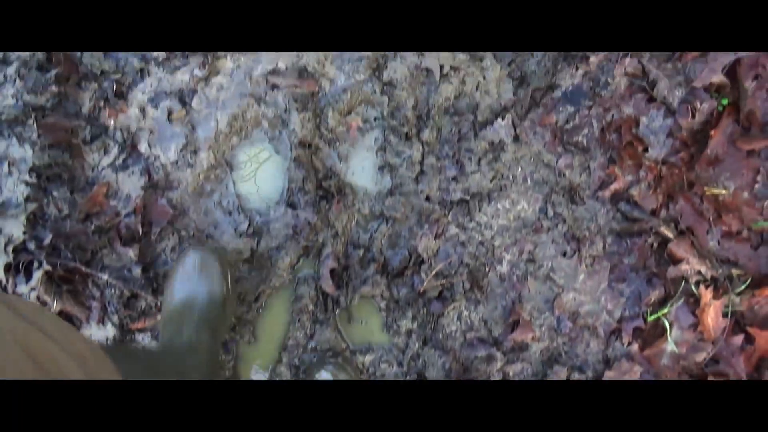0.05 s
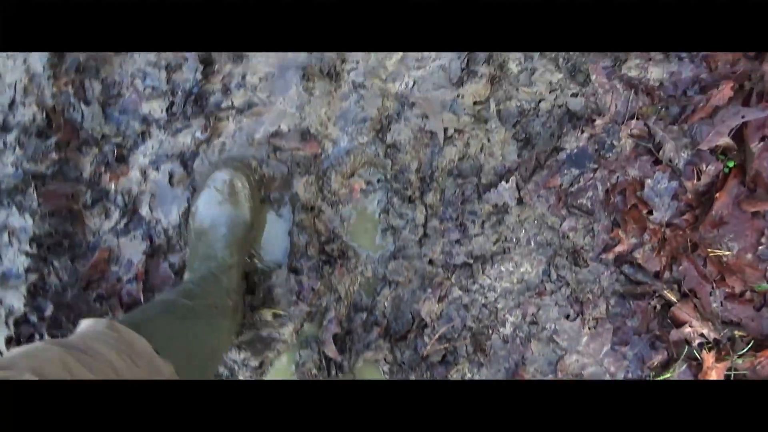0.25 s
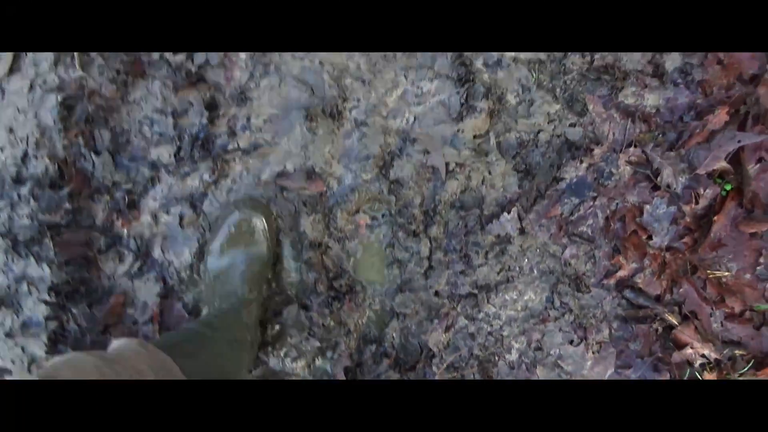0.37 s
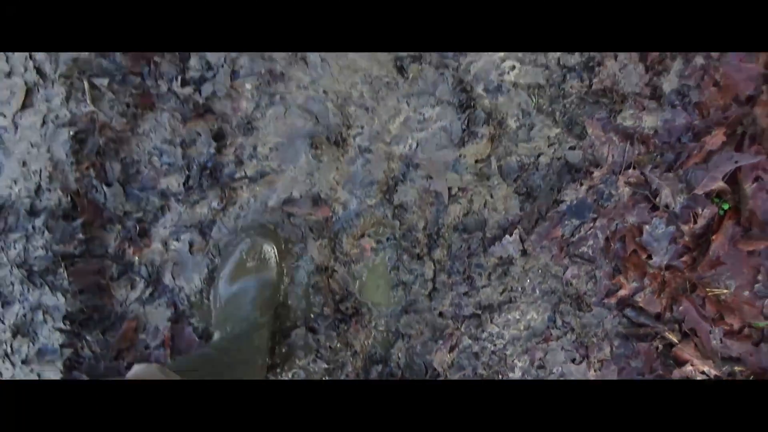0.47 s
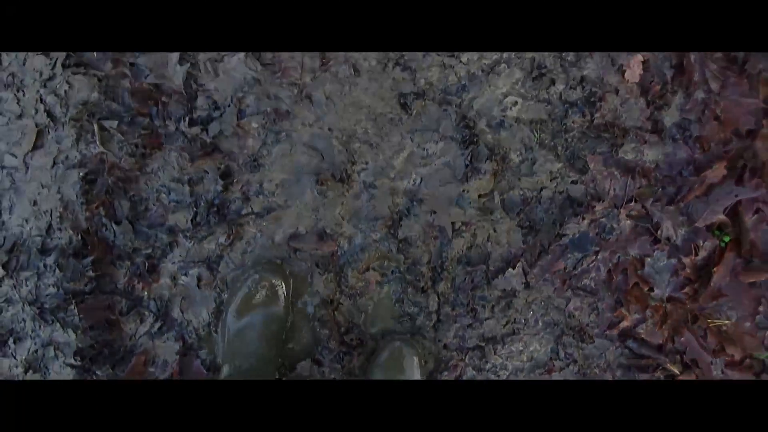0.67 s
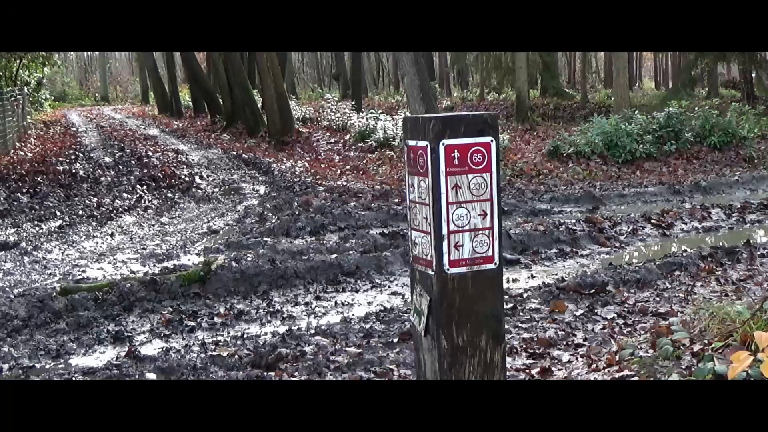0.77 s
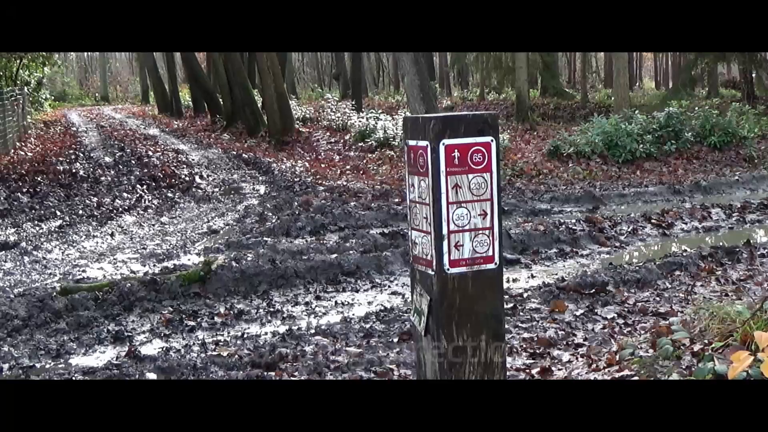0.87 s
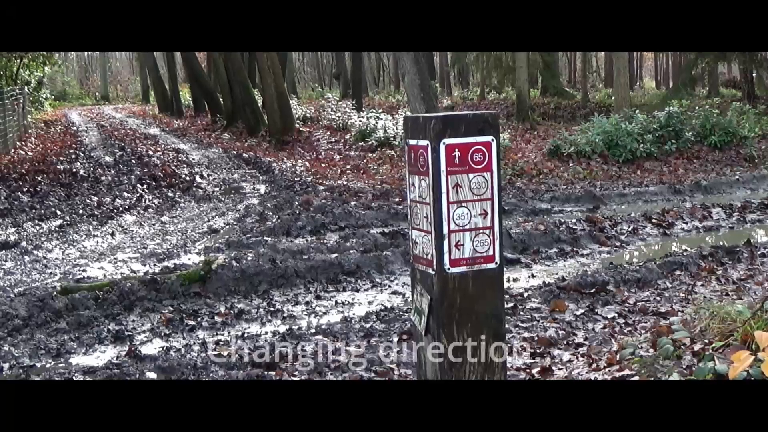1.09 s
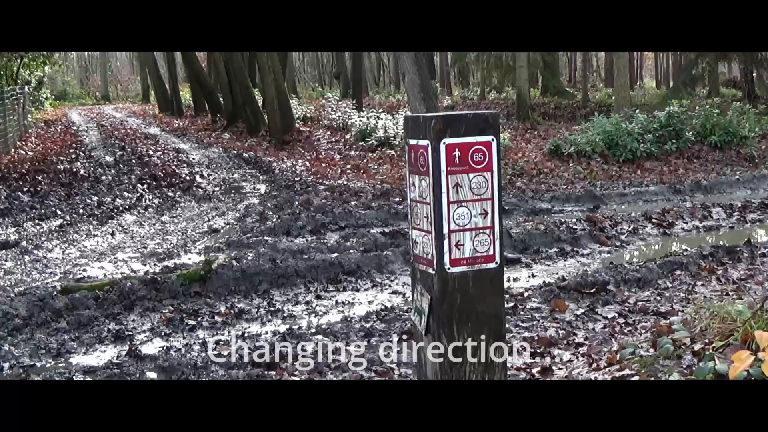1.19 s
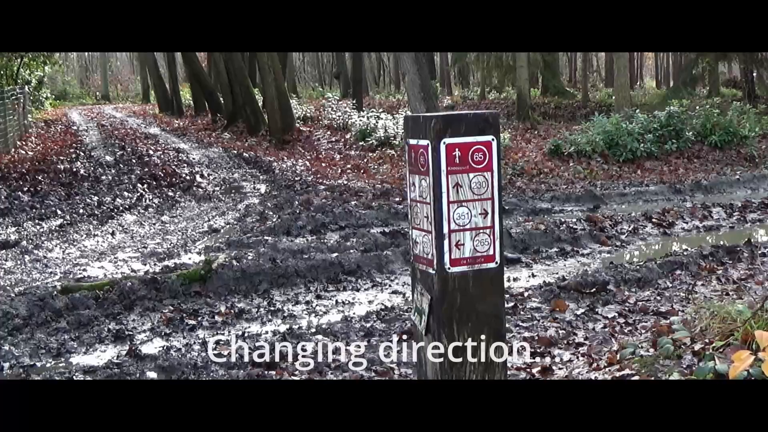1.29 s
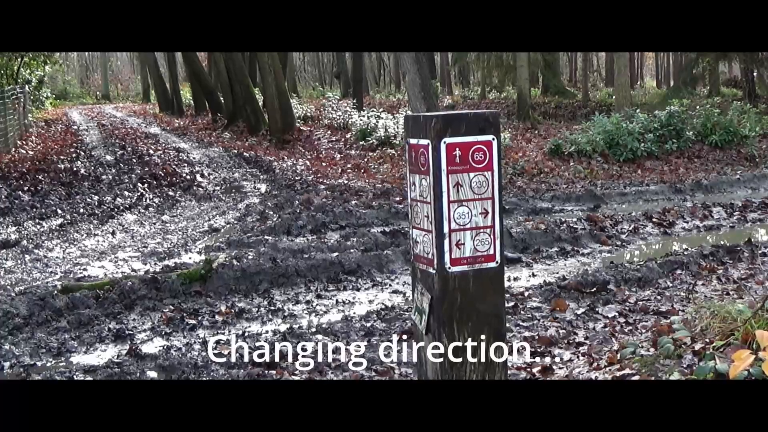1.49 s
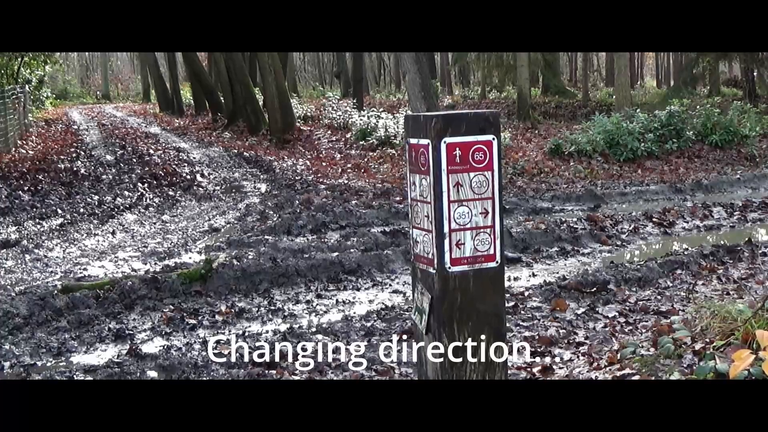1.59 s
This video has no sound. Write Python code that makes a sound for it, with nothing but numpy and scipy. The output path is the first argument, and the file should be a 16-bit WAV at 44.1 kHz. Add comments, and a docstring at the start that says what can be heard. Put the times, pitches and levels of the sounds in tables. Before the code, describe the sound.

Close to the microphone, rubber boots squelch twice in wet mud, slurping and bubbling over soft thuds. Midway through the second step the sound switches to a quiet wood with a low, far rumble and faintly ticking leaves.

```python
"""A muddy path under dead leaves, where two rubber-boot steps fall close by.
Each step squeezes out a crackle of bursting films and small bubbles over a lower slurp of mud.
Water spurts from under the sole, air pockets pop and the soft ground thuds; wet leaves tick and rustle.
Partway through the second step the scene cuts to a quiet wood with a far rumble and faint leaves."""
import sys
import numpy as np
from scipy import signal
from scipy.fft import next_fast_len
from scipy.io import wavfile
from scipy.ndimage import uniform_filter1d

SR = 44100
rng = np.random.default_rng(int(sys.argv[2]) if len(sys.argv) > 2 else 0)


def digitize_waveform(pressure):
    """Quantize a signal to 16-bit integers and store it at the path in sys.argv[1].

    Rows of a 2-D input are taken as channels; values are limited to [-1, 1].
    """
    field = np.atleast_2d(pressure).T
    bounded = np.clip(field, -1, 1)
    quanta = np.round(bounded * 32767).astype(np.int16)
    wavfile.write(sys.argv[1], SR, quanta)


N = 72765
TIME = np.arange(N) / SR
CUT_S = .806  # the path gives way to the quiet wood

# spectra of the outdoor air: f/Hz, relative level/dB
PATH_SPECTRUM = [(15, -23), (28, -3), (70, 0), (130, -7), (260, -10.5), (460, -4), (700, -10), (1260, -12),
                 (2500, -17), (4500, -24), (5700, -19.5), (7400, -12.5), (9500, -16.5), (12500, -18.5),
                 (16000, -20.5)]
WOOD_SPECTRUM = [(15, -25), (28, -10), (55, -1.5), (110, 0), (240, -5), (400, -13.5), (590, -8),
                 (900, -18.5), (1260, -19), (2300, -29.5), (3100, -30), (4700, -34.5), (7200, -28),
                 (8500, -34), (12500, -37), (16000, -41)]
# filters on the side signal of the air and the steps, so the channels differ slightly: f/Hz, gain/dB
PATH_SIDE = [(30, -25), (100, -23), (300, -9), (700, -12), (2000, -23.5), (7000, -19), (16000, -21)]
WOOD_SIDE = [(30, -18), (100, -18), (300, -15.5), (700, -17.5), (2000, -19.5), (4000, -24.5), (7000, -10),
             (12000, -20), (16000, -32)]
STEP_SIDE = [(100, -26), (200, -22), (330, -15), (700, -28), (1500, -22), (3000, -21), (7000, -26),
             (16000, -24.5)]
# dead leaves rustling: t/s, length/s, level/dB, f/Hz
LEAF_RUSTLES = [(.592, .025, -44, 13000), (.858, 0.01, -59, 11000), (1.586, .014, -53, 4250)]
# wet leaves and drops ticking: t/s, level/dB, f/Hz
LEAF_TICKS = [(.0035, -29.5, 14000), (.025, -28, 12600), (.0408, -37, 10100), (.0455, -35, 7260),
              (.1028, -42, 13000), (.1131, -29, 7400), (.1203, -45, 13000), (.1847, -30, 10000),
              (.4655, -24, 11100), (.5138, -32, 8140), (.53, -33.5, 10000), (.5667, -30.5, 12600),
              (1.1228, -48.5, 12000), (1.1612, -49, 11500), (1.3588, -47, 10000), (1.464, -43, 10200),
              (1.504, -46.5, 7600), (1.611, -49, 11900)]
# the walker's weight settling on the heel: t/s, length/s, f/Hz, peak level/dB
HEEL_LOAD = [(.465, .085, 66.8, -43.5)]
# the boot meeting the ground: t/s, length/s, level/dB, f/Hz
BOOT_THUDS = [(.163, 0.034, -40, 343), (.213, 0.027, -43.5, 270), (.314, 0.025, -38.5, 700),
              (.425, 0.027, -44, 189), (.68, 0.027, -45, 149), (.759, 0.015, -39.5, 567)]
# air pockets popping in the mud: t/s, f/Hz, peak level/dB, 60 dB decay time/s
AIR_POCKETS = [(.208, 2600, -25, .008), (.2225, 2540, -28, 0.048), (.2455, 2940, -13.5, 0.003),
               (.2765, 1610, -17.5, 0.034), (.3165, 1670, -27, 0.012), (.3193, 1100, -14.5, .011),
               (.3195, 746, -18.5, 0.025), (.3255, 1390, -31, 0.0054), (.3525, 2180, -22, 0.026),
               (.4195, 1200, -24, 0.015), (.4262, 2010, -15.5, 0.02), (.4495, 2270, -26.5, 0.013),
               (.5993, 2200, -35.5, 0.019), (.6515, 2080, -28.5, 0.0089), (.695, 1640, -23, 0.012),
               (.7003, 1250, -11.5, 0.01), (.7005, 680, -17, 0.018), (.7222, 2470, -18.5, 0.011),
               (.7345, 1680, -15.5, 0.011), (.745, 1890, -18.5, 0.019), (.7485, 3450, -16.5, 0.015),
               (.7612, 1610, -22, .01), (.7808, 1240, -17.5, 0.0078)]
# water spurting from under the sole: t/s, length/s, level/dB, f/Hz
WATER_SPURTS = [(.2055, 0.0044, -25, 8400), (.2378, .004, -23, 9150), (.2455, 0.0023, -15, 7940),
                (.2493, .001, -16.5, 8600), (.254, .0055, -19.5, 6530), (.2672, 0.0014, -13.5, 8600),
                (.2735, 0.0046, -18.5, 9000), (.2797, 0.0031, -16, 10400), (.2857, 0.0027, -18, 11100),
                (.294, 0.004, -21.5, 3560), (.3078, 0.0054, -21.5, 7350), (.3194, .0018, -21, 8260),
                (.3232, 0.0012, -19.5, 14000), (.3255, .005, -26, 8300), (.3678, .0055, -26, 7560),
                (.371, 0.00084, -20.5, 7100), (.383, 0.002, -25, 7800), (.387, 0.002, -22, 9600),
                (.396, 0.0027, -24.5, 12500), (.4127, 0.0052, -28, 7850), (.4255, 0.0013, -19.5, 14000),
                (.427, 0.0022, -20.5, 8450), (.706, 0.0018, -19, 8100), (.7092, 0.0031, -16, 8400),
                (.7138, 0.0041, -16.5, 7800), (.718, .003, -25, 7200), (.7305, .0015, -19.5, 7600),
                (.7454, .002, -17, 10300), (.7485, 0.0035, -20.5, 7060), (.7512, 0.0012, -20.5, 11000),
                (.7738, 0.0025, -26, 10600), (.785, 0.0022, -29.5, 11300), (.7922, 0.0012, -28, 7450),
                (.7955, 0.0014, -25.5, 11400)]
# filters that colour the spurts, slurp and crackle: f/Hz, gain/dB
SPURT_COLOUR = [(100, -36.5), (500, -8), (1500, -10.5), (3400, -1), (5600, -9.5), (7300, 8), (11500, -2.5),
                (16000, -9.5)]
SLURP_COLOUR = [(60, -28), (200, -15), (400, -11), (650, -4), (1200, 0.5), (2100, 2), (2800, -12),
                (4500, -0.5), (16000, -73)]
CRACKLE_COLOUR = [(100, -48), (600, -24), (1500, -17), (3300, -7), (4500, -8.5), (5600, -9.5), (7300, -1.5),
                  (9000, -4), (11600, -2.5), (16000, -20)]
# envelopes of the slurp and crackle, one list for each step: t/s, level/dB
SLURP_ENVELOPES = [
    [(.16, -69), (.2, -38), (.24, -35.5), (.278, -27.5), (.303, -33), (.324, -24.5), (.34, -30.5),
     (.405, -35), (.42, -33.5), (.438, -41.5), (.5, -52)],
    [(.58, -65), (.602, -43.5), (.622, -47), (.645, -39.5), (.675, -35), (.697, -27), (.73, -33),
     (.757, -38.5), (.768, -34), (.81, -38.5)],
]
CRACKLE_ENVELOPES = [
    [(.14, -47), (.198, -39.5), (.208, -25.5), (.234, -30.5), (.277, -19), (.303, -27), (.328, -23),
     (.345, -32.5), (.387, -30), (.405, -37.5), (.422, -30.5), (.436, -33), (.52, -56.5)],
    [(.56, -63), (.605, -39.5), (.624, -45.5), (.638, -31.5), (.682, -27.5), (.715, -26), (.738, -28),
     (.76, -38), (.787, -33.5), (.797, -31), (.81, -30.5)],
]


def amp(db):
    """Amplitude ratio of a level in decibels."""
    return 10 ** (np.asarray(db) / 20)


def unit(x):
    """Normalisation to an rms of 1."""
    return x / np.sqrt(np.mean(x ** 2) + 1e-20)


def levelled(x, length, db):
    """Equivalent level: x gets the energy of a steady sound of this level and length."""
    return amp(db) * x * np.sqrt(length * SR / np.sum(x ** 2))


def play(table, source):
    """Superposition: each row of a table sounds at its own time."""
    out = np.zeros(N)
    for start_s, *row in table:
        sound = source(*row)
        part = out[round(start_s * SR):][:len(sound)]
        part += sound[:len(part)]
    return out


def colour(x, points, centre_hz=1000, bump_db=0, octaves=.3):
    """Minimum-phase filtering by a gain curve with an optional resonant bump."""
    size = next_fast_len(len(x) + 2048)
    log_f = np.log2(abs(np.fft.fftfreq(size, 1 / SR)) + 1)
    hz, db = np.transpose(points)
    bump = bump_db / (1 + ((log_f - np.log2(centre_hz)) / octaves) ** 2)
    gain_db = np.interp(log_f, np.log2(hz + 1), db) + bump
    response = np.exp(np.conj(signal.hilbert(np.log(amp(gain_db)))))
    return np.fft.ifft(np.fft.fft(x, size) * response).real[:len(x)]


def burst(length):
    """Transient noise with a fast rise and an exponential decay."""
    u = np.arange(int(4 * length * SR) + 256) / (length * SR)
    return u * np.exp(-u / 0.29) * rng.choice([-1., 1.], len(u))


def ring(samples, hz, cycles):
    """A damped oscillator, falling to 1/e in the given number of cycles."""
    t = np.arange(samples) / SR
    return np.exp(-t * hz / cycles) * np.sin(2 * np.pi * hz * t)


def grains(per_s, spread_db, cycles, low_hz, high_hz, clump_db=0, pitches=36):
    """Shot noise: random impulses excite damped oscillators; clump_db makes their strength flicker."""
    clumps = unit(uniform_filter1d(rng.standard_normal(N), size=130))
    strength_db = spread_db * np.minimum(rng.exponential(1, N), 4) + clump_db * clumps
    clicks = amp(strength_db) * rng.choice([-1, 1], N) * (rng.random(N) < per_s / SR)
    oscillator = rng.integers(0, pitches, N)
    out = np.zeros(N)
    for k, hz in enumerate(np.linspace(low_hz, high_hz, pitches)):
        out += signal.oaconvolve(clicks * (oscillator == k), unit(ring(1024, hz, cycles)))[:N]
    return out


def follow(x, envelopes):
    """Amplitude modulation: a texture is evened out, then takes the envelope of each step."""
    even = x / np.sqrt(abs(uniform_filter1d(x ** 2, size=700)) + 1e-12)
    levels_db = [np.interp(TIME, *np.transpose(step), left=-120, right=-120) for step in envelopes]
    return even * amp(levels_db).sum(axis=0)


def scatter(x, t60):
    """Diffuse scattering: a short echo whose impulse response has unit energy."""
    t = np.arange(6000) / SR
    tail = rng.standard_normal(len(t)) * amp(-60 * t / t60) * (t > .001)
    return signal.oaconvolve(x, tail / np.linalg.norm(tail))[:N]


def stereo(mid, side, left_db):
    """Sum and difference stereo; a level difference shifts the image sideways."""
    return np.array([(mid + side) * amp(left_db), (mid - side) * amp(-left_db)])


def air(spectrum, width, db, left_db):
    """Stationary noise: outdoor rumble and hiss, widened by an uncorrelated side signal."""
    mid, side = (unit(colour(noise, spectrum)) for noise in rng.standard_normal((2, N)))
    return amp(db) * stereo(mid, colour(side, width), left_db)


def rustle(length, db, hz):
    """Friction noise of dead leaves brushing together."""
    spectrum = [(200, -1), (2000, -13), (8000, -4), (16000, -11)]
    return levelled(colour(burst(length), spectrum, hz, bump_db=11, octaves=0.17), length, db)


def tick(db, hz, snap_s=0.00032, tail_s=0.0023):
    """A brief impulse has a broad spectrum: a wet leaf or drop snaps, with a faint tail."""
    t = np.arange(600) / SR
    envelope = np.exp(-t / snap_s) + amp(-19) * np.exp(-t / tail_s)
    snap = envelope * rng.choice([-1., 1.], len(t))
    spectrum = [(200, -31), (3000, -14), (7000, 2), (14000, -4.5), (20000, -25)]
    return levelled(colour(snap, spectrum, hz, bump_db=11, octaves=0.27), length=0.00071, db=db)


def settle(length, hz, db):
    """Compliance: the ground yields under the heel in a few slow cycles."""
    t = np.arange(0, length, 1 / SR)
    return amp(db) * np.sin(np.pi * t / length) ** 2 * np.sin(2 * np.pi * hz * t)


def thud(length, db, hz):
    """A cushioned impact: the boot on soft ground excites mainly low frequencies."""
    spectrum = [(30, -8.5), (200, -2), (800, 0), (3000, -22), (16000, -42)]
    return levelled(colour(burst(length), spectrum, hz, bump_db=14.5, octaves=0.68), length, db)


def pop(hz, db, t60, attack_s=0.00064, glide_per_s=9.3):
    """Cavity resonance: an air pocket rings briefly, its pitch climbing as it opens."""
    t = np.arange(0, 1.5 * t60, 1 / SR)
    envelope = np.minimum(t / attack_s, 1) * amp(db - 60 * np.maximum(t - attack_s, 0) / t60)
    return envelope * np.sin(2 * np.pi * hz * (t + glide_per_s * t ** 2 / 2))


def spurt(length, db, hz):
    """Turbulence: water jets through a narrow gap and excites its resonance."""
    jet = burst(length)
    resonance = signal.fftconvolve(jet, ring(len(jet), hz, cycles=4.8))[:len(jet)]
    return levelled(unit(colour(jet, SPURT_COLOUR)) + amp(1) * unit(resonance), length, db)


def slurp():
    """Heavily damped oscillations, in clumps, of mud being pushed aside."""
    mud = grains(per_s=1200, spread_db=1.5, cycles=1.96, low_hz=395, high_hz=3470, clump_db=1.5)
    return follow(colour(mud, SLURP_COLOUR), SLURP_ENVELOPES)


def crackle():
    """Rupturing wet films radiate clicks, while small bubbles resonate for longer."""
    films = grains(per_s=5800, spread_db=1, cycles=1.1, low_hz=1200, high_hz=15300)
    bubbles = grains(per_s=500, spread_db=2, cycles=22, low_hz=1972, high_hz=14000, pitches=60)
    froth = unit(films) + amp(-3) * unit(bubbles)
    return follow(colour(froth, CRACKLE_COLOUR), CRACKLE_ENVELOPES)


def footsteps():
    """Direct sound of the boots in mud, plus scattering from the ground and legs."""
    ground = play(HEEL_LOAD, settle) + play(BOOT_THUDS, thud)
    squelch = play(AIR_POCKETS, pop) + play(WATER_SPURTS, spurt) + slurp() + crackle()
    direct = ground + squelch
    mid = direct + amp(-20.5) * scatter(direct, t60=0.077)
    side = colour(scatter(direct, t60=0.011), STEP_SIDE)
    return stereo(mid, side, left_db=0.13)


def scene():
    """Superposition of air, leaves and steps; at the cut only the leaves carry on into the wood."""
    on_path = np.clip((CUT_S - TIME) / 0.00062, 0, 1)
    in_wood = np.interp(TIME, [CUT_S - .001, CUT_S, CUT_S + 0.0085], [0, .7, 1])
    path_air = air(PATH_SPECTRUM, PATH_SIDE, db=-43, left_db=0.06)
    wood_air = air(WOOD_SPECTRUM, WOOD_SIDE, db=-44, left_db=-.5)
    leaf_mid = play(LEAF_RUSTLES, rustle) + play(LEAF_TICKS, tick)
    leaf_side = colour(scatter(leaf_mid, t60=.01), STEP_SIDE)
    leaves = stereo(leaf_mid, leaf_side, left_db=0.4)
    return wood_air * in_wood + leaves + (path_air + footsteps()) * on_path


def record(dry):
    """Band limiting: a linear-phase low-pass filter removes the highest treble."""
    low_pass = signal.firwin(511, cutoff=15850, window=("kaiser", 9), fs=SR)
    return signal.oaconvolve(dry, low_pass[None], "same")


dry = scene()
out = record(dry)
digitize_waveform(out)
```